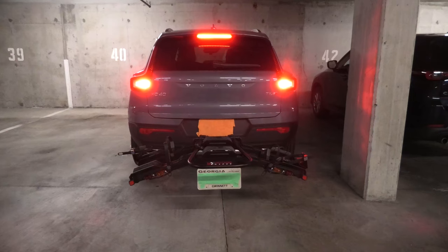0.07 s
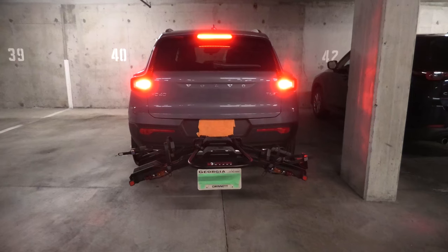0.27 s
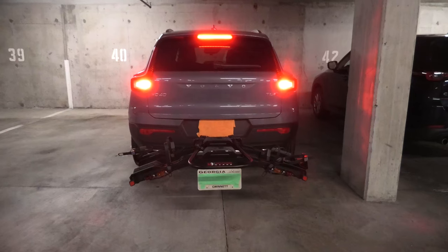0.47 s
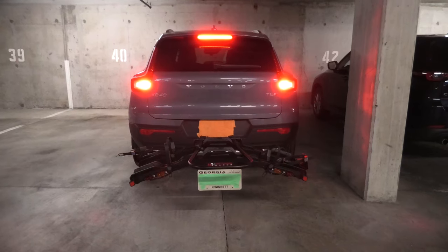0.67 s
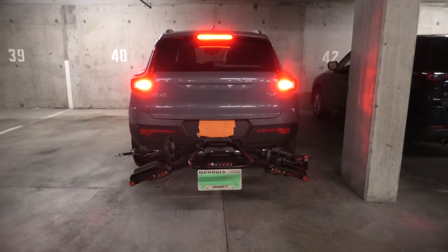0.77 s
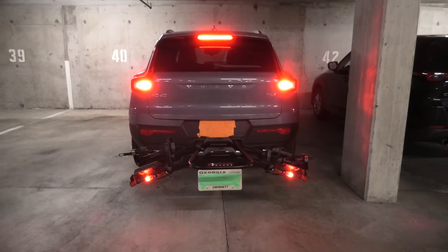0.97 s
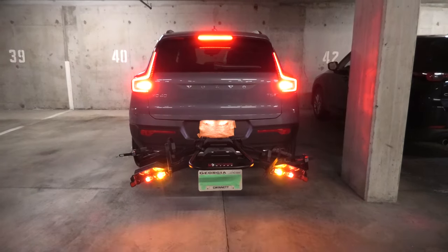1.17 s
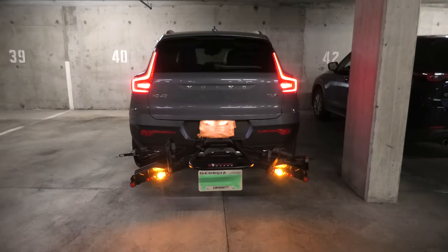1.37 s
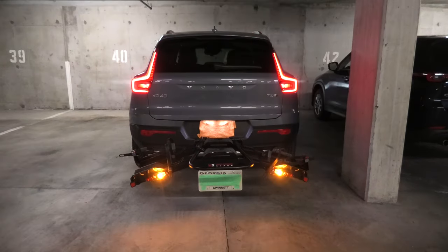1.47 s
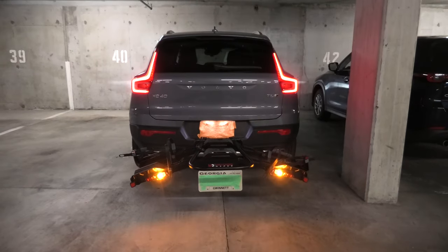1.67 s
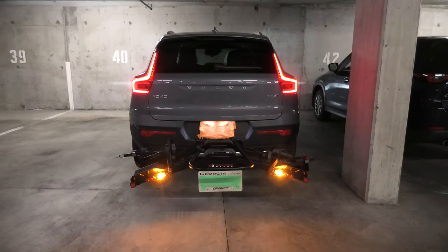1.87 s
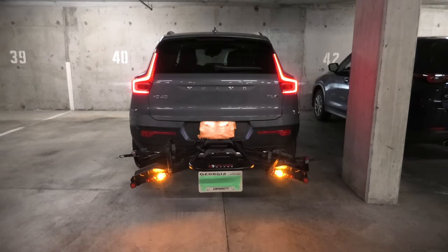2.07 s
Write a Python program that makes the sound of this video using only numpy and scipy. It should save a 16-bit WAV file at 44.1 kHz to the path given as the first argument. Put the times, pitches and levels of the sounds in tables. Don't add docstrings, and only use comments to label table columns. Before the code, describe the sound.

A car engine starts in an echoing concrete garage. After a very brief silence, low ventilation hum fades in quickly. At 0.23 s the starter clanks sharply, then grinds in pulses until about 0.8 s. The engine catches with a thud at 0.7 s, flares to its peak around 1.1-1.25 s with ticking valves and hissing belts, then sinks towards a smoother, lower idle by 2 s.

```python
import sys
import numpy as np
from scipy import signal
from scipy.fft import rfft, irfft, next_fast_len
from scipy.io import wavfile
from scipy.ndimage import uniform_filter1d, map_coordinates

SR = 44100
rng = np.random.default_rng(int(sys.argv[2]) if len(sys.argv) > 2 else 0)


def to_linear_factor(level_db):
    exponent = np.asarray(level_db, float) / 20
    return 10 ** exponent


def dump(signal):
    limited = np.clip(np.atleast_2d(signal).T, -1, 1)
    pcm = np.round(limited * 32767).astype(np.int16)
    wavfile.write(sys.argv[1], SR, pcm)


N = 93977
SECONDS = np.arange(N) / SR

CATCH_S = 0.705
DRY_S, OILING_S = 0.88, 0.46
STROKE_RISE_S = 0.0098
HISS_PATCHY_DB = 0.8

# frequency in Hz, left-right likeness from 0 to 1.
ALIKE = [(60, 0.79), (130, 0.9), (290, 0.83), (640, 0.69), (1410, 0.43), (3100, 0.71), (6820, 0.96),
         (15000, 0.81)]


def unit(x):
    return x / np.sqrt(np.mean(x ** 2) + 1e-20)


def along(points, hz):
    f, v = np.transpose(points)
    return np.interp(np.log(hz + 1), np.log(f + 1), v)


def wobble(rate):
    knots = rng.standard_normal(int(N * rate / SR) + 4)
    return map_coordinates(knots, [np.arange(N) * rate / SR])


def filtered(x, response):
    m = next_fast_len(N + SR // 2)
    return irfft(rfft(x, m) * response(np.fft.rfftfreq(m, 1 / SR)), m)[..., :N]


def colour(spectrum):
    return lambda hz: to_linear_factor(along(spectrum, hz))


def resonant(peaks):
    return lambda hz: to_linear_factor(sum(db * w * w / (w * w + 4 * (hz - centre) ** 2) for centre, w, db in peaks))


def rush(gain, patchy_db, gate=1, alike=ALIKE):
    z = signal.stft(rng.standard_normal((2, N)), nperseg=512)[2]
    field = uniform_filter1d(rng.standard_normal(z.shape[1:]), 5, 0)
    field = uniform_filter1d(field, 10, 1)
    patchy = signal.istft(z * to_linear_factor(patchy_db * unit(field)), nperseg=512)[1][:, :N]
    turn = lambda hz: np.arccos(np.clip(along(alike, hz), -1, 1)) / 2
    mid, side = filtered(gate * patchy, lambda hz: gain(hz) * [np.cos(turn(hz)), np.sin(turn(hz))])
    return unit(np.array([mid + side, mid - side]))


def bursts(starts, levels_db, t60s, rise_s):
    age = np.maximum(SECONDS - np.asarray(starts)[:, None], 0)
    decay = to_linear_factor(np.asarray(levels_db)[:, None] - 60 * age / np.asarray(t60s)[:, None])
    each = decay * (1 - np.exp(-age / rise_s))
    return np.sqrt((each ** 2).sum(axis=0))


def ventilation():
    # frequency in Hz, level in dB per Hz.
    duct_tone = [(15, -40), (25, -15), (166, -3.5), (229, -2), (516, -15), (658, -6.5), (1940, -18),
                 (5280, -37.5), (16000, -35.5)]
    # frequency in Hz, left-right likeness.
    duct_alike = [(100, .9), (1000, 0.82), (3000, .5), (7000, 0.9), (12000, 0.22)]
    return to_linear_factor(-47.5) * rush(colour(duct_tone), patchy_db=1.5, alike=duct_alike)


def garage(x):
    # frequency in Hz, t60 in seconds.
    wall_t60 = [(100, 1.43), (1000, 2.03), (4000, 2.7), (12000, 0.47)]
    hz, t, z = signal.stft(rng.standard_normal((2, SR)), SR, nperseg=256)
    a, b = z * to_linear_factor(-60 * t / along(wall_t60, hz)[:, None])
    turn = np.arccos(np.clip(along(ALIKE, hz), -1, 1))[:, None] / 2
    mid, side = a * np.cos(turn), b * np.sin(turn)
    tail = signal.istft(np.array([mid + side, mid - side]), SR, nperseg=256)[1]
    late = np.pad(x.mean(axis=0), (500, 0))[None]
    answer = signal.fftconvolve(late, tail / np.linalg.norm(tail[0]), axes=1)[:, :N]
    return to_linear_factor(-5) * answer


def starter():
    # start in seconds, level in dB, decay t60 in seconds.
    clanks = [
        (.2275, -36, 0.042),
        (0.241, -17, 0.082),
        (0.2602, -16.5, 0.11),
        (0.6223, -25, 0.048),
        (0.7276, -37, 0.054),
        (.8469, -31, 0.089),
    ]
    # start in seconds, level in dB, brightness in dB, t60 in seconds.
    strokes = [
        (0.225, -25, -5.5, 1.5),
        (0.324, -26, -14, 1.27),
        (.385, -32.5, -7, 2),
        (0.489, -26.5, -8, 1.32),
        (0.623, -24.5, -6.5, 1.05),
        (.68, -41.5, 11.5, 0.66),
        (0.726, -30.5, 2.5, 0.7),
        (.768, -39, 11.5, .7),
        (.80, -45, 0, 0.43),
        (.847, -52, -7, 0.62),
    ]
    # frequency in Hz, width in Hz, height in dB.
    housing = [(560, 100, 6), (880, 130, 5), (1400, 110, 2), (2150, 250, 4), (2510, 60, 3), (3050, 150, 2),
               (5680, 300, 2), (8020, 150, 1)]
    flywheel = [(1430, 60, 22), (1370, 40, 16), (830, 50, 12), (1030, 60, 12), (565, 40, 12)]
    # frequency in Hz, level in dB per Hz.
    low_tone = [(71, -50), (120, -15), (316, -12.5), (387, -9), (554, -6), (757, -10), (898, -3.5),
                (1020, -3.5), (5000, -15.5), (6500, -32), (11000, -120)]
    high_tone = [(2350, -38), (4000, -2.5), (5010, -16), (5730, 1), (6210, -1.5), (8060, 1), (11300, -5),
                 (16000, -26)]
    clank_tone = [(88, -53), (150, -3), (303, -20), (555, -3.5), (1290, -8), (1450, 0), (3220, -13.5),
                  (8070, -6), (16000, -18.5)]
    # frequency in Hz, left-right likeness.
    clank_alike = [(300, 0.97), (3000, 1), (12000, .95)]

    start, db, bright_db, t60 = np.transpose(strokes)
    teeth = to_linear_factor(1 * wobble(95.2))
    ring = resonant(housing)
    pinion = resonant([(6550, 300, 4)])
    low = rush(lambda hz: colour(low_tone)(hz) * ring(hz), patchy_db=0.5, gate=teeth)
    high = rush(lambda hz: colour(high_tone)(hz) * ring(hz), HISS_PATCHY_DB, gate=teeth)
    grind = bursts(start, db, t60, STROKE_RISE_S) * low
    grind = grind + bursts(start, db + bright_db - 1, 0.55 * t60, STROKE_RISE_S) * high

    sing = rush(lambda hz: colour(low_tone)(hz) * resonant(flywheel)(hz), patchy_db=-2)
    sing = bursts([0.24], [-31], [1.5], STROKE_RISE_S) * sing

    blows = rush(lambda hz: colour(clank_tone)(hz) * ring(hz) * pinion(hz), patchy_db=2.5,
                 gate=to_linear_factor(1.6 * wobble(301)), alike=clank_alike)
    return grind + sing + bursts(*np.transpose(clanks), rise_s=0.0012) * blows


def valve_train_and_belts(first_s):
    # frequency in Hz, level in dB per Hz.
    valve_tone = [(880, -18.5), (1500, -3), (1730, -7), (2000, -1.5), (2340, -7.5), (2750, -9),
                  (3360, -11.5), (3990, -11), (5000, -22.5), (6500, -71), (11000, -120)]
    belt_tone = [(2820, -14.5), (4800, -3.5), (7070, -3), (8140, -2.5), (8960, -5), (10400, -5),
                 (13500, -9.5), (15200, -17), (16000, -15)]
    # frequency in Hz, width in Hz, height in dB.
    pulley = [(1990, 300, 3), (8750, 500, -3), (11100, 900, 4)]
    ring = resonant(pulley)
    dryness = np.exp(-np.maximum(SECONDS - DRY_S, 0) / OILING_S)
    running = np.clip((SECONDS - first_s) / (DRY_S - first_s), 0, 1)
    ticking = rush(lambda hz: colour(valve_tone)(hz) * ring(hz), HISS_PATCHY_DB, gate=to_linear_factor(0.64 * wobble(120)))
    hiss = rush(lambda hz: colour(belt_tone)(hz) * ring(hz), HISS_PATCHY_DB, gate=to_linear_factor(0.47 * wobble(200)))
    valves = to_linear_factor(-39.5 + 8 * dryness) * ticking
    belts = to_linear_factor(-49.5 + 9.5 * dryness) * hiss
    whine = to_linear_factor(-62 + wobble(5)) * np.sin(2 * np.pi * 9993 * SECONDS)
    return running * (valves + belts + whine)


def block_roar(puff):
    # frequency in Hz, level in dB per Hz.
    block_tone = [(150, -28), (250, -7), (291, -15.5), (350, -3.5), (527, -3), (660, -4), (962, -6),
                  (1050, -10), (1700, -20), (2210, -31), (3740, -120)]
    return to_linear_factor(0.71 * wobble(10.88)) * rush(colour(block_tone), patchy_db=1.3, gate=np.sqrt(puff))


def exhaust(rate, fired, puff, load):
    # multiple of the firing rate, level in dB over load.
    order_db = [
        (1, -20),
        (2, -16),
        (3, -22),
        (4, -19),
        (5, -17),
        (7, -22.5),
    ]
    # frequency in Hz, level in dB per Hz.
    pipe_tone = [(15, -39.5), (25, -19), (70, -0.5), (102, -3), (226, -0.5), (290, -9), (330, 2),
                 (430, -40), (730, -120)]
    # frequency in Hz, width in Hz, height in dB.
    silencer = [(76, 14, 5), (165, 20, 3), (223, 14, 7)]
    pipe_patchy_db = 1.5

    orders = 0
    for multiple, db in order_db:
        sway = to_linear_factor(db + 2.5 * wobble(6.25))
        cycles = multiple * fired + rng.random() + 0.031 * wobble(8.5)
        orders = orders + sway * np.sin(2 * np.pi * cycles)
    pipe = rush(lambda hz: colour(pipe_tone)(hz) * resonant(silencer)(hz), pipe_patchy_db, gate=puff)
    flare = to_linear_factor(6.5 * np.exp(-((SECONDS - 0.93) / 0.09) ** 2))
    lug = np.maximum(33 - rate, 0) * (SECONDS > DRY_S + OILING_S)
    note = flare * (np.sqrt(2) * orders + to_linear_factor(-9.5) * pipe) * to_linear_factor(0.5 * lug)
    thud = bursts([CATCH_S], [-36], [0.57], STROKE_RISE_S) * rush(colour(pipe_tone), pipe_patchy_db)
    return thud + load * note


def engine():
    # time in seconds, firings a second, load in dB.
    run = [(0.719, 21, -40.5), (0.851, 28, -34), (0.952, 33, -31.5), (1.02, 38, -29.5), (1.119, 44, -28),
           (1.25, 46.5, -29), (1.4, 37.3, -30), (1.599, 36.5, -31), (1.8, 36.6, -30.5), (1.949, 32.5, -31),
           (2.13, 29.7, -32)]
    s, rates, loads_db = np.transpose(run)
    rate = np.interp(SECONDS, s, rates)
    load = to_linear_factor(np.where(SECONDS < CATCH_S, -70, np.interp(SECONDS, s, loads_db)))
    fired = np.cumsum(rate) / SR
    size = to_linear_factor(3 * rng.standard_normal(200))[fired.astype(int)]
    puff_share = 0.22
    puff = 1 - puff_share + puff_share * 2 * size * np.sin(np.pi * fired) ** 2
    return exhaust(rate, fired, puff, load) + load * block_roar(puff) + valve_train_and_belts(s[0])


def scene():
    car = starter() + engine()
    return ventilation() + garage(car) + car


def low_pass(x):
    return signal.sosfilt(signal.butter(12, 16130, fs=SR, output="sos"), x)


def record(dry):
    # frequency in Hz, left over right in dB.
    lean = [(60, -3.0), (180, -1.0), (550, 1), (1650, 0), (4970, 0.5), (15000, 0.0)]
    port = lambda hz: to_linear_factor(-7 * np.exp(-((hz - 2880) / 40) ** 2))
    sides = np.array([[0.5], [-0.5]])
    x = filtered(dry, lambda hz: (hz < 15800) * port(hz) * to_linear_factor(along(lean, hz) * sides))
    open_s, fade_s = 0.0791, 0.0077
    x = x * np.clip((SECONDS - open_s) / fade_s, 0, 1)
    return low_pass(x)


dry = scene()
out = record(dry)
dump(out)
```